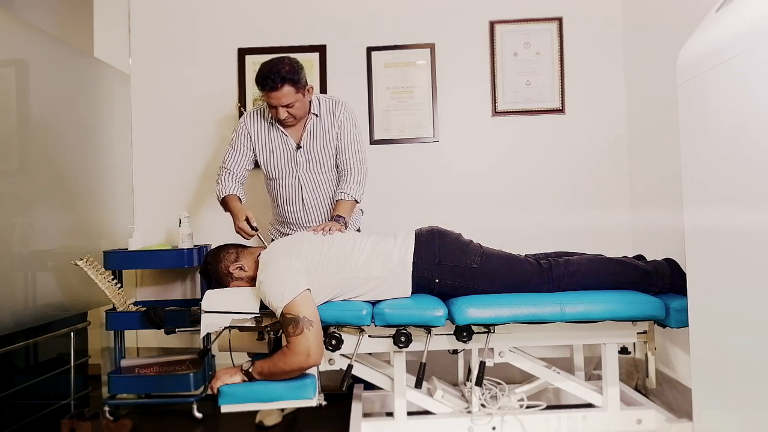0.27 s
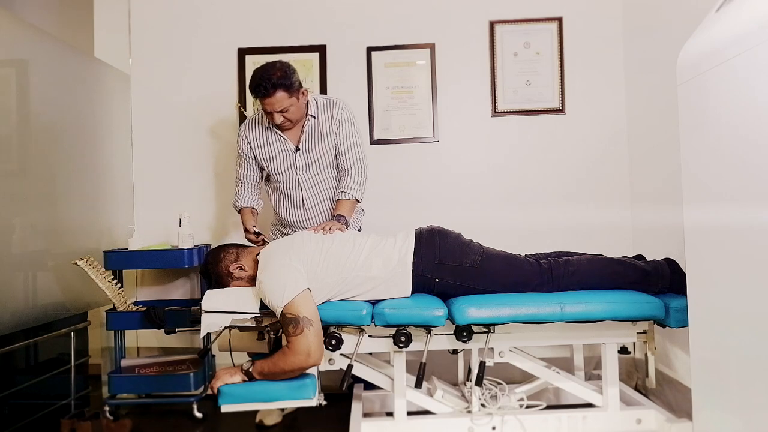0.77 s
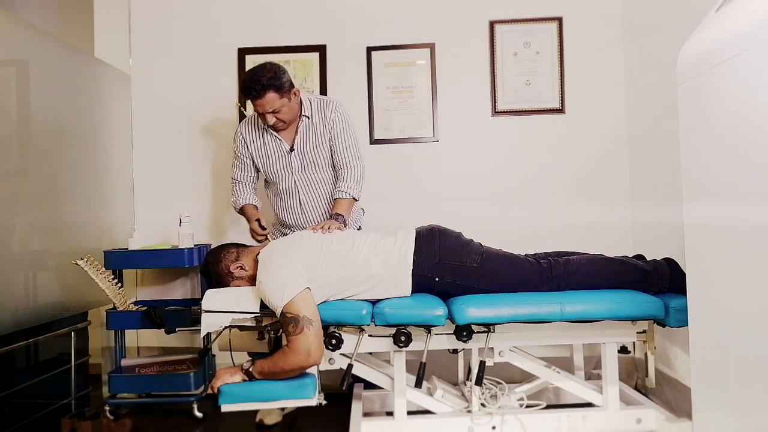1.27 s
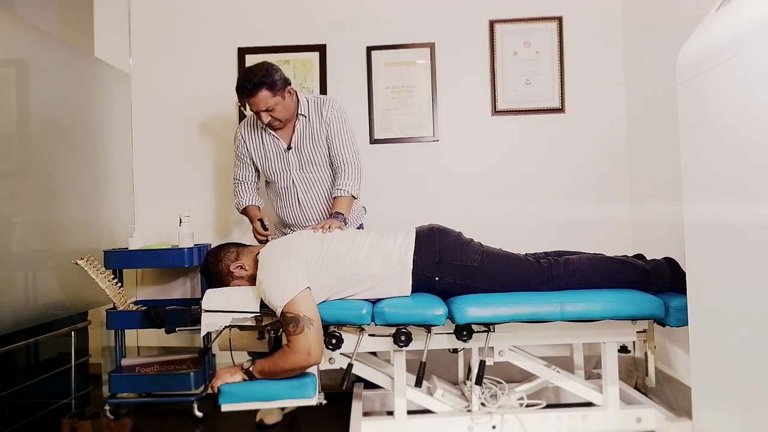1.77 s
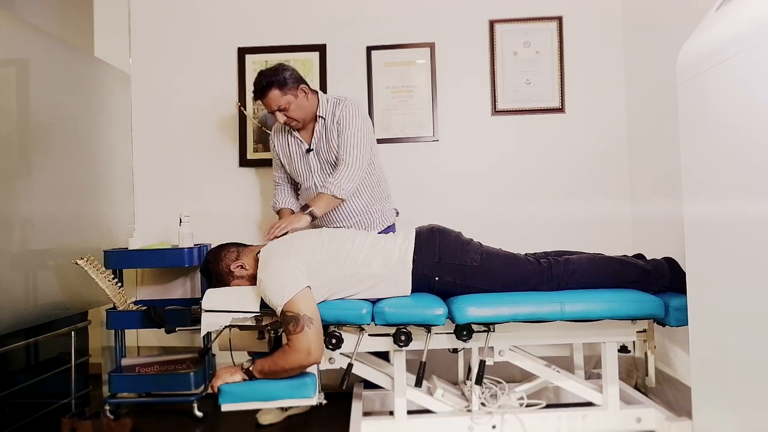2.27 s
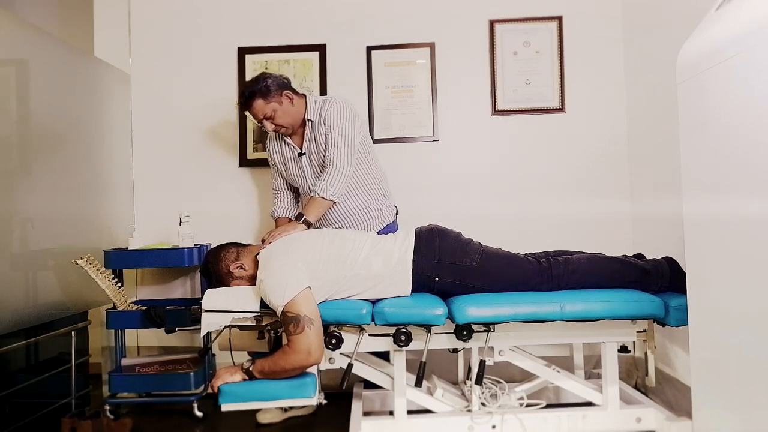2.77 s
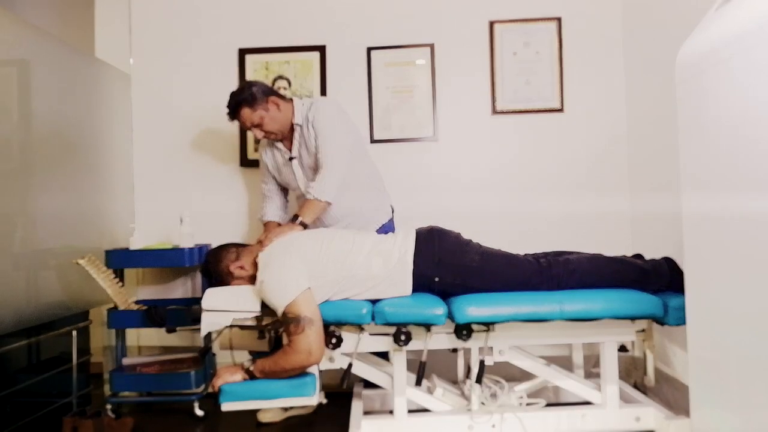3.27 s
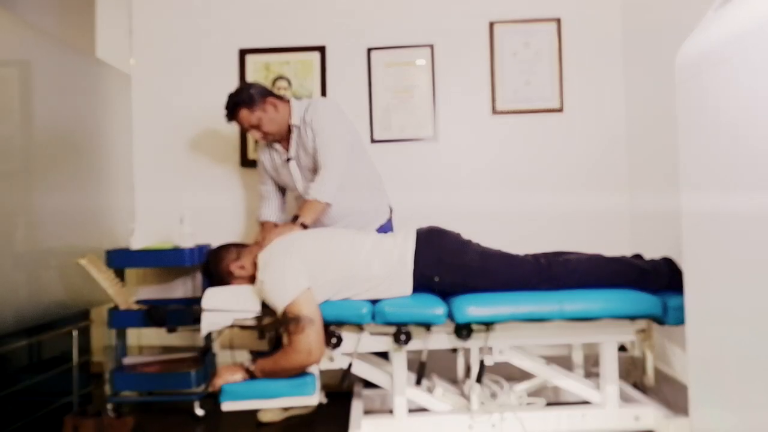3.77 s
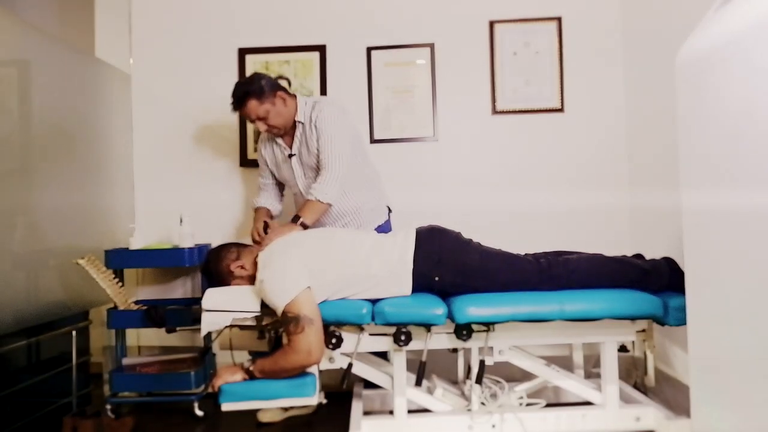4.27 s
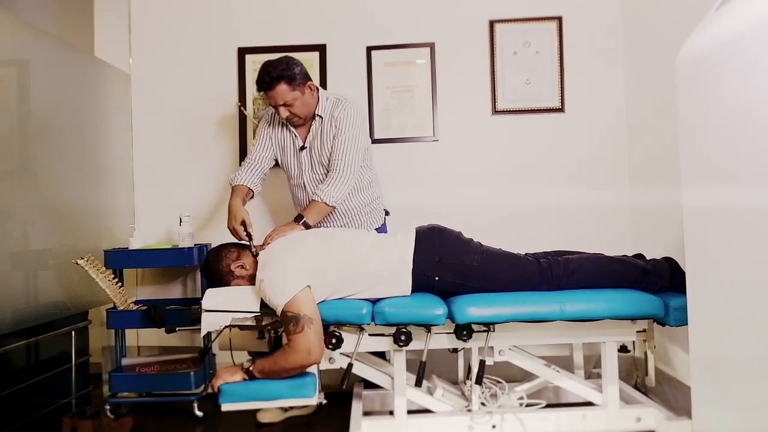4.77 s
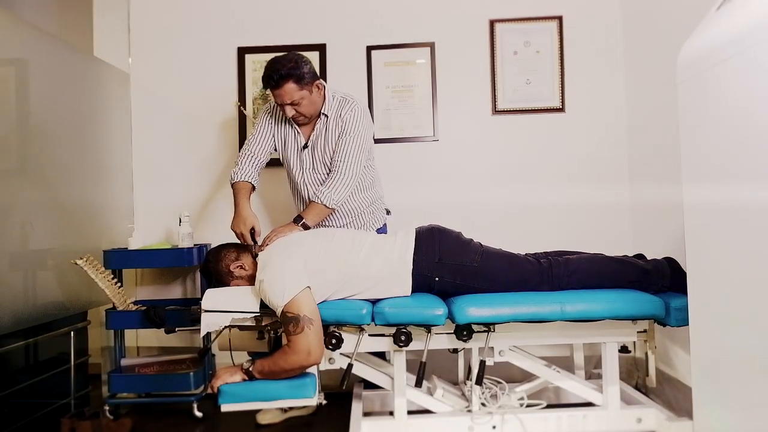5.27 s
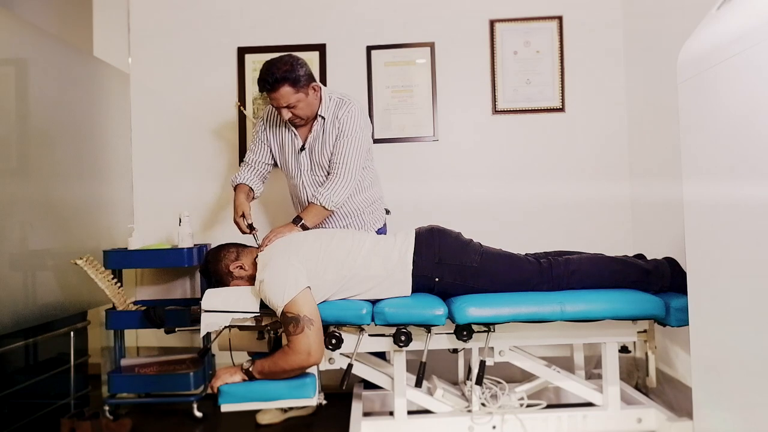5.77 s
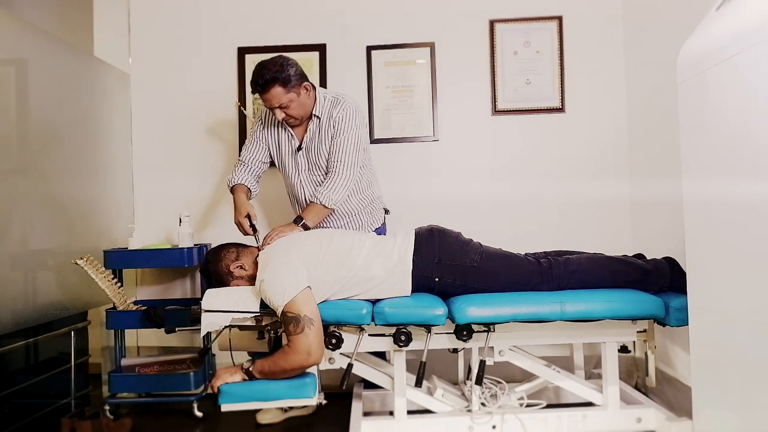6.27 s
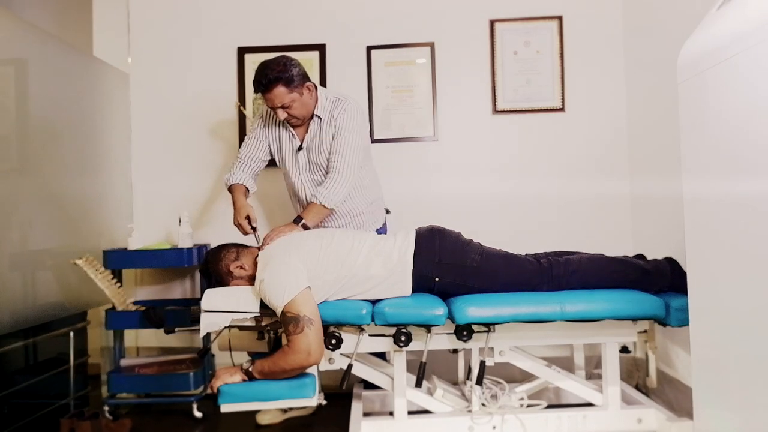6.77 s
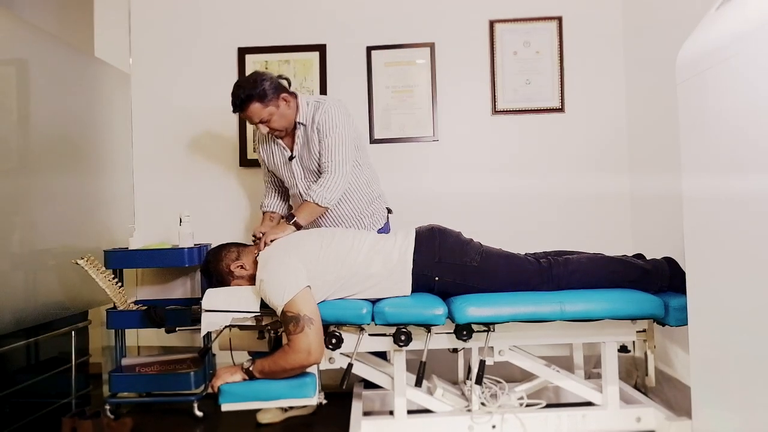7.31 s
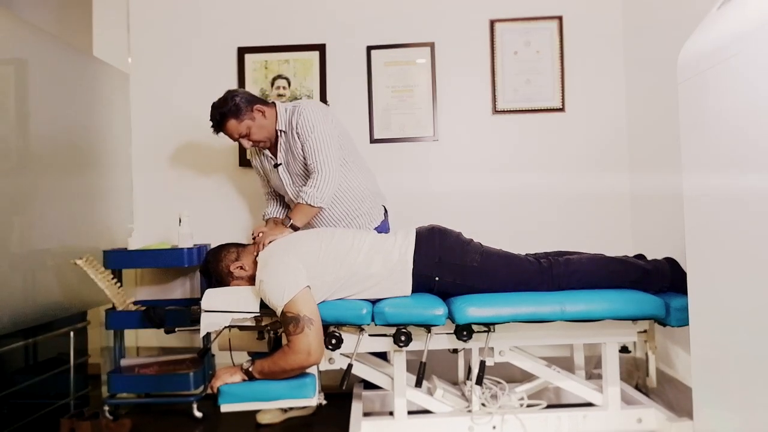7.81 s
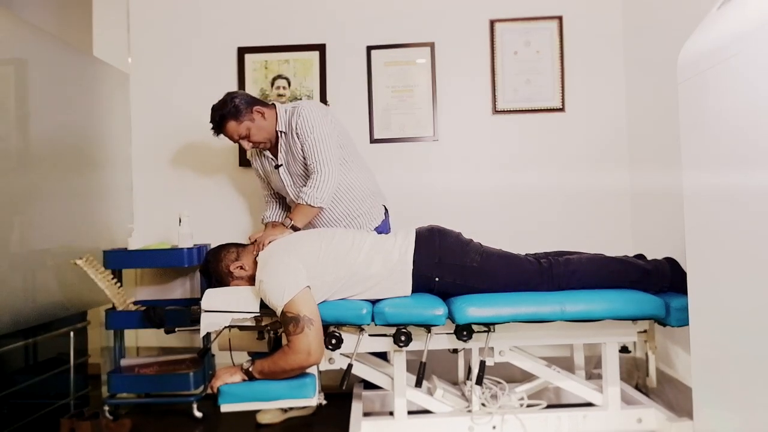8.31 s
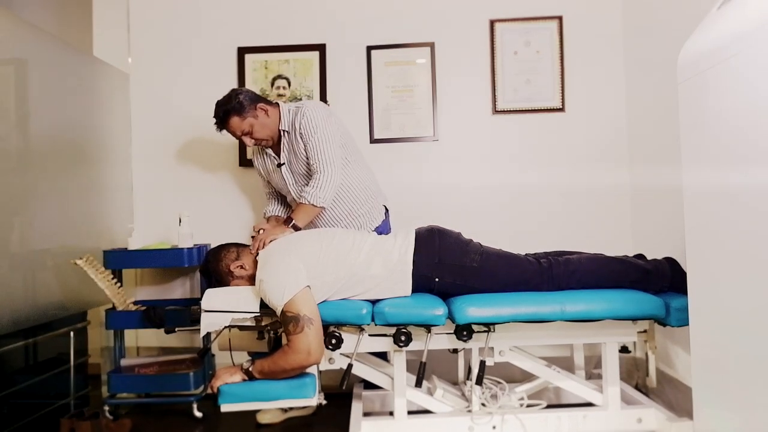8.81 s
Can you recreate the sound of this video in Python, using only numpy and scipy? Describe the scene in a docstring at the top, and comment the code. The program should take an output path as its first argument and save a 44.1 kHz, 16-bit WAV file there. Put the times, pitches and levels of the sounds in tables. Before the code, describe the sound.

Very close to a clip-on microphone, a spring-loaded steel hand instrument is fired repeatedly against a clothed back. Each shot is a handle clack, a tiny catch tick, a hard bright snap with sizzling spring ring, then a click back. Shots come in groups of two to five, about a third of a second apart, with pauses between. Bare walls add a quick flutter; cloth and padding shift softly.

```python
"""Spring-loaded adjusting instrument

It is fired again and again on a person's back, close to a clip-on microphone. At a shot the handle clacks,
the catch ticks, the hammer trips, the steel spring sizzles out and the handle clicks back: shaped noise bursts.
Blows and ticks flutter between two bare walls (repeated echoes) and fade in a diffuse tail.
Noise also makes the padded table's thuds, cloth brushes and room air; drifting sines make a faint whine."""
import sys
import numpy as np
from scipy import signal
from scipy.fft import rfft, irfft, next_fast_len
from scipy.io import wavfile
from scipy.ndimage import map_coordinates

SR = 44100
rng = np.random.default_rng(int(sys.argv[2]) if len(sys.argv) > 2 else 0)


def store_pcm(level_fs):
    """Save levels as 16-bit WAV."""
    pcm = np.round(np.clip(level_fs, -1, 1) * 32767).astype(np.int16)
    wavfile.write(sys.argv[1], SR, np.atleast_2d(pcm).T)


N = 399105  # samples
TOP_HZ = 15700  # band limit

# Spectrum of the steel spring and scraping steel: pitch_hz [Hz], level_db [dB per Hz, relative]
SPRING_SPECTRUM = [(1300, -21), (2200, -7.5), (2700, -4.5), (3700, -2.5), (5300, -3), (7500, -0.5),
                   (10500, -1), (13500, 2), (16000, -3)]
# Spectrum of the ringing barrel: pitch_hz [Hz], level_db [dB per Hz, relative]
BARREL_SPECTRUM = [(700, -32), (1100, -17), (1550, -18), (1720, -5), (1820, 0), (1920, -4), (2080, -13),
                   (2600, -20), (4000, -38)]
# Spectrum of brushing cloth: pitch_hz [Hz], level_db [dB per Hz, relative]
CLOTH_SPECTRUM = [(100, -5), (500, -1.5), (3000, -1), (8000, 0), (16000, -10.5)]


def amp(db):
    """Decibels to linear gain."""
    return 10 ** (np.asarray(db) / 20)


def unit(x):
    """Scale to rms 1."""
    return x / np.sqrt(np.mean(x ** 2) + 1e-20)


def colour(points, hz):
    """Gain of (Hz, dB) points on a log axis."""
    f, db = np.transpose(points)
    return amp(np.interp(np.log(hz + 1), np.log(f + 1), db))


def noise(points, size, ripple_db=0, ripple_hz=600):
    """Coloured noise of rms 1, with chance resonances about ripple_hz apart."""
    hz = np.fft.rfftfreq(size, 1 / SR)
    ripple = map_coordinates(rng.standard_normal(512), [hz / ripple_hz], mode="wrap")
    spectrum = rfft(rng.standard_normal(size)) * colour(points, hz)
    return unit(irfft(spectrum * amp(ripple_db * ripple), size))


def swell(t, rise, t60):
    """Peaks at t = 0: climbs 60 dB in rise seconds, falls 60 dB in t60."""
    return amp(60 * np.minimum(t / rise, -t / t60))


def rattle(depth_db):
    """One second of random level shake, about 250 steps a second, as a gain of rms 1."""
    steps = np.arange(SR) / SR * 250
    return unit(amp(depth_db * map_coordinates(rng.standard_normal(256), [steps], mode="wrap")))


def resonance(hz, skirt_db):
    """Spectrum of a damped mode, down to skirt_db at 0.7 and 1.54 times its frequency."""
    return [(.5 * hz, -40), (0.7 * hz, skirt_db), (hz, 0), (1.54 * hz, skirt_db), (2 * hz, -30), (4 * hz, -55)]


def contact(points, envelope, ripple_db=0):
    """A brief broadband burst, its random spectrum partly evened out; rms 1 when counted over 4.5 ms."""
    size = len(envelope)
    hz = np.fft.rfftfreq(size, 1 / SR)
    z = rfft(rng.standard_normal(size) * envelope)
    evened = z / np.sqrt(np.abs(z) + 1e-9)
    ripple = map_coordinates(rng.standard_normal(64), [hz / 900], mode="wrap")
    x = irfft(evened * colour(points, hz) * amp(ripple_db * ripple), size)
    return x / np.sqrt(np.sum(x ** 2) / (.0045 * SR))


def add(track, s, sound):
    """Mix a sound into the track from time s."""
    start = round(s * SR)
    sound = sound[max(-start, 0):N - start]
    track[max(start, 0):][:len(sound)] += sound


def background():
    """Room air, a thin whine of slowly drifting phase, and a soft rustle as the hands move to a new spot."""
    # Room air spectrum: pitch_hz [Hz], level_db [dB per Hz, relative]
    air_spectrum = [(15, -22.5), (25, -17), (86, -8), (178, -3), (267, 1), (421, -1), (598, 3), (1200, -8),
                    (1300, -5), (1410, -6), (4620, -16), (9500, -19.5), (15000, -21)]
    # Room air level over time: time_s [s], level_db [dB, before the trim below]
    air_levels = [(0.0, -41), (0.28, -38), (0.91, -44.5), (1.71, -35.5), (2.7, -44), (4.21, -34),
                  (4.89, -41.5), (5.52, -37.5), (6.37, -47), (6.83, -39.5), (7.81, -42), (8.12, -37.5),
                  (9.05, -38.5)]
    # Whine tones: pitch_hz [Hz], level_db [dB rms]
    whine_tones = [(102, -70), (614, -76.5), (1335, -60)]
    t = np.arange(N) / SR
    air_trim_db = -5
    air = amp(np.interp(t, *np.transpose(air_levels)) + air_trim_db) * noise(air_spectrum, N)
    whine = np.zeros(N)
    for hz, db in whine_tones:
        drift = np.cumsum(rng.standard_normal(N)) / np.sqrt(SR)
        whine += amp(db) * np.sqrt(2) * np.sin(2 * np.pi * hz * t + 6 * drift)
    rustle = amp(-48.0) * noise(CLOTH_SPECTRUM, N) * swell(t - 2.42, 2.5, 2.0)
    return air + whine + rustle


def handling():
    """Weight shifts on the padding in soft low thuds, and cloth brushes cloth."""
    # Padded table spectrum: pitch_hz [Hz], level_db [dB per Hz, relative]
    pad_spectrum = [(25, -13.5), (60, -9.5), (100, -0.5), (170, -7), (280, -17), (700, -26), (2000, -76)]
    # Soft thuds of the table: start_s [s], level_db [dB], t60_s [s]
    thuds = [(0.171, -31.5, 0.15), (0.954, -42, 0.31), (2.092, -47, 0.57), (2.527, -38.5, 0.2),
             (2.69, -48, 0.24), (4.442, -43, .25), (7.448, -31, 0.14), (7.51, -40, 0.21)]
    # Sleeve and shirt brushing: start_s [s], level_db [dB], t60_s [s]
    brushes = [(2.53, -37.5, 0.34), (6.19, -45.5, 0.27), (6.35, -45, 0.25), (7.43, -28.5, 0.23)]
    out, t = np.zeros(N), np.arange(SR) / SR - 1 / 10
    for s, db, t60 in thuds:
        add(out, s + t[0], amp(db) * noise(pad_spectrum, SR) * swell(t - .01, 0.2, t60))
    for s, db, t60 in brushes:
        add(out, s + t[0], amp(db) * noise(CLOTH_SPECTRUM, SR) * swell(t, 0.0142, t60))
    return out


def reverb(x, low_t60=1.1, high_t60=0.25):
    """The small room's diffuse tail, treble dying first."""
    hz, t, z = signal.stft(rng.standard_normal(SR), SR, nperseg=256)
    t60 = np.interp(np.log(hz + 1), np.log([500, 12000]), [low_t60, high_t60])
    tail = signal.istft(z * amp(-60 * t / t60[:, None]), SR, nperseg=256)[1]
    return signal.fftconvolve(x, tail / np.linalg.norm(tail))[:N]


def flutter(x, first_db, trip_db):
    """Sound bounces between parallel walls, a little weaker on every round trip."""
    round_trip_s = .0167
    out = x.copy()
    for k in range(12):
        lag = round((k + 1) * round_trip_s * SR)
        out[lag:] += amp(first_db + k * trip_db) * x[:-lag]
    return out


def contacts():
    """Every press, catch slip, stray tick and release as (s, steel dB, ring dB, ring Hz, knock dB)."""
    # The handle is pressed home: start_s [s], knock_db [dB], steel_db [dB], ring_hz [Hz]
    presses = [(0.084, -25.5, -16.5, 1910), (0.3857, -24.5, -18.5, 1860), (1.4136, -38, -19.5, 2000),
               (1.7267, -37.5, -20.5, 1800), (3.2713, -38, -35.5, 2670), (3.6211, -38.5, -26, 2300),
               (3.934, -35.5, -26, 2550), (4.2172, -38, -26, 3230), (4.9259, -35, -52, 2010),
               (5.4098, -22, -22.5, 2100), (6.514, -37.5, -24, 2370), (6.8598, -26.5, -14, 4230),
               (8.2638, -37.5, -39, 1900), (8.6228, -34, -30, 1910)]
    # Catch slips, and a few faint stray high ticks: start_s [s], ring_db [dB], ring_hz [Hz]
    catches_and_ticks = [(0.1104, -18, 12400), (.1367, -11, 10800), (.408, -17, 13100),
                         (0.433, -10.5, 10200), (0.9774, -36.5, 7640), (1.1352, -21, 10600),
                         (1.4636, -17, 14500), (1.7544, -32, 13700), (2.8706, -34, 14200),
                         (2.903, -24.5, 14300), (3.3398, -18, 12000), (3.6515, -24, 14100),
                         (3.9607, -21, 14300), (4.247, -23, 14400), (4.684, -41, 12900),
                         (5.0582, -19, 7000), (5.072, -11.5, 10500), (5.448, -21, 12400),
                         (5.4772, -11, 10900), (6.556, -10, 9400), (6.901, -12, 11000), (6.9156, -14, 3470),
                         (7.792, -35.5, 11300), (8.3213, -18.5, 9600)]
    # The handle springs back: start_s [s], steel_db [dB], ring_db [dB], ring_hz [Hz]
    releases = [(0.01, -24, -35, 1870), (.304, -14, -36, 1620), (0.6026, -14.5, -26, 1750),
                (1.324, -19, -32, 1940), (1.6385, -23, -28.5, 1820), (1.9604, -23, -25.5, 3660),
                (3.1288, -21.5, -25, 3500), (3.5369, -21, -24.5, 2930), (3.861, -20.5, -21, 2930),
                (4.1577, -28, -22.5, 2930), (4.4483, -21, -27, 3280), (5.2781, -19, -43, 1970),
                (5.2946, -15, -23, 2120), (5.7034, -21, -24, 2050), (5.7189, -15, -22.5, 2160),
                (6.753, -17.5, -22.5, 4180), (6.769, -17, -20, 4350), (7.097, -15, -16, 3430),
                (8.1133, -25.5, -24.5, 2470), (8.1236, -24, -26, 2580), (8.5343, -25, -21.5, 3750),
                (8.546, -23, -21.5, 4400), (8.8735, -21.5, -26, 2623)]
    # a press's ring grows more slowly than its knock (dB per dB)
    usual_knock_db, usual_ring_db, ring_per_knock = -34, -24.5, 0.76
    # the stronger the ring of a slip or tick, the more steel scrapes (dB per dB)
    hard_tick_db, hard_steel_db, steel_per_ring = -9, -14.5, 1.01
    tick_knock_db = -30.5  # relative to the ring
    release_knock_db = -33.5  # relative to the steel: letting go hardly pushes the grip
    rows = []
    for s, knock_db, steel_db, hz in presses:
        ring_db = usual_ring_db + ring_per_knock * (knock_db - usual_knock_db)
        rows.append((s, steel_db, ring_db, hz, knock_db))
    for s, ring_db, hz in catches_and_ticks:
        steel_db = hard_steel_db + steel_per_ring * (ring_db - hard_tick_db)
        rows.append((s, steel_db, ring_db, hz, ring_db + tick_knock_db))
    for s, steel_db, ring_db, hz in releases:
        rows.append((s, steel_db, ring_db, hz, steel_db + release_knock_db))
    return rows  # steel and knock get a trim in clicks()


def clicks():
    """Short contacts: each mixes scraping steel, a damped ring, a stir of the barrel and a push on the grip."""
    # Spectrum of the pushed grip: pitch_hz [Hz], level_db [dB per Hz, relative]
    grip_spectrum = [(40, -18.5), (150, -2.5), (450, 0.5), (950, -3.5), (1300, -19.5), (2500, -27.5)]
    overtone_ratio, overtone_db = 2.2, -10.5  # second mode of the handle
    steel_trim_db, knock_trim_db = 4.0, 5
    out, t = np.zeros(N), np.arange(4096) / SR - 1 / 40
    for s, steel_db, ring_db, ring_hz, knock_db in contacts():
        scraping = swell(t, 0.0049, 0.01) + amp(-8.5) * swell(t, 0.058, 0.032)
        steel = contact(SPRING_SPECTRUM, scraping, ripple_db=3.5)
        ringing = swell(t, 0.0021, 0.0079) + amp(-15.0) * swell(t, .01, 0.058)
        ring = contact(resonance(ring_hz, skirt_db=-17), ringing)
        overtone_hz = overtone_ratio * ring_hz
        if overtone_hz < TOP_HZ:
            ring = ring + amp(overtone_db) * contact(resonance(overtone_hz, skirt_db=-23.5), ringing)
        barrel = contact(BARREL_SPECTRUM, swell(t, 0.0029, 0.021))
        knock = contact(grip_spectrum, swell(t, 0.002, 0.0042))
        click = amp(steel_db + steel_trim_db) * (steel + amp(-14.5) * barrel)
        click += amp(ring_db) * ring + amp(knock_db + knock_trim_db) * knock
        add(out, s + t[0], click)
    return out


def twangs():
    """After some releases the spring shivers on in one cluster of modes; two faint rustles stand alone."""
    # Spring twangs and two faint rustles: start_s [s], level_db [dB], pitch_hz [Hz]
    twangs_and_rustles = [(3.128, -34, 3070), (3.537, -32.5, 2870), (4.159, -28.5, 2950),
                          (4.806, -47, 3830), (7.791, -44, 10200), (8.114, -29, 2700), (8.875, -27, 2500)]
    out, t = np.zeros(N), np.arange(SR) / SR
    for s, db, hz in twangs_and_rustles:
        add(out, s, amp(db - 60 * t / 0.44) * noise(resonance(hz, skirt_db=-14.5), SR))
    return out


def shots():
    """The handle scrapes, the hammer slides and strikes; the coil's dense modes ring on, the lower ones longest."""
    # Shots: start_s [s], spring_db [dB before trim], barrel_db [dB before trim], scrape_db [dB, squeezing],
    # mode_hz [Hz, strongest coil mode], mode_db [dB]
    shot_list = [(-.13, -22, -21, -25, 3600, -34), (.164, -9, -26, -18, 3560, -43),
                 (.455, -9, -29, -18.5, 3820, -42), (1.166, -11, -25.5, -31, 2900, -26.5),
                 (1.488, -11, -27.5, -22.5, 4030, -19), (1.8, -11, -25.5, -20.5, 4040, -20.5),
                 (2.935, -11.5, -29, -41.5, 3800, -17.5), (3.374, -11, -30, -23, 3660, -21.5),
                 (3.7, -11.5, -30.5, -24.5, 3700, -19), (4.012, -10, -29, -19.5, 3920, -24.5),
                 (4.293, -9.5, -32.5, -25, 3780, -28), (5.114, -8.5, -20.5, -25, 4370, -29),
                 (5.506, -8, -21, -39, 3380, -31), (6.584, -10, -23, -17, 4220, -18.5),
                 (6.94, -9.5, -22, -26, 4530, -46), (7.916, -10.5, -31.5, -45, 2710, -23),
                 (8.358, -10.5, -31, -25, 3100, -24.5), (8.693, -10, -27.5, -20, 3450, -25)]
    # Spectrum of the tip's knock: pitch_hz [Hz], level_db [dB per Hz, relative]
    knock_spectrum = [(30, -87), (90, -40), (170, 0.5), (330, -1.5), (480, 4), (680, 11), (950, 5),
                      (1300, 3.5), (2200, -7.5)]
    usual_shot_db, usual_t60_s, t60_s_per_db = -13, 0.5, 0.01  # a harder shot dies sooner
    spring_trim_db, barrel_trim_db = 1.5, -2
    knock_under_db = 15  # below the untrimmed spring level
    out, t = np.zeros(N), np.arange(SR) / SR - 1 / 10
    hz = np.fft.rfftfreq(SR, 1 / SR)
    high_share = 1 / (1 + (7000 / (hz + 1)) ** 4)
    tripped = np.clip((t + 0.027) / 0.0082, 0, 1)  # the catch lets go just before the blow
    for s, spring_db, barrel_db, scrape_db, mode_hz, mode_db in shot_list:
        t60 = usual_t60_s - t60_s_per_db * (spring_db - usual_shot_db)
        scrape = noise(SPRING_SPECTRUM, SR, ripple_db=4, ripple_hz=925) * rattle(depth_db=4)
        scrape *= swell(t + 0.038, 0.13, 0.25) * (1 - tripped)
        coil = noise(SPRING_SPECTRUM, SR, ripple_db=1.7, ripple_hz=200.2) * rattle(depth_db=0.33)
        high = irfft(rfft(coil) * high_share, SR)
        spring = high * swell(t, 0.24, 1.004 * t60) + (coil - high) * swell(t, 0.071, 1.356 * t60)
        crack = amp(-2.5) * noise(SPRING_SPECTRUM, SR, ripple_db=3.0) * swell(t, 0.049, 0.038)
        mode = noise(resonance(mode_hz, skirt_db=-9), SR) * swell(t, 0.11, 0.7)
        # the loose barrel rattles as it rings
        barrel_envelope = swell(t, 0.12, .62) + amp(-10) * swell(t, 0.0098, 0.058)
        barrel = noise(BARREL_SPECTRUM, SR) * rattle(depth_db=3) * barrel_envelope
        knock = noise(knock_spectrum, SR) * swell(t - .012, 0.17, 0.51)
        blow = amp(spring_db + spring_trim_db) * (spring + crack) + amp(mode_db) * mode
        blow += amp(barrel_db + barrel_trim_db) * barrel + amp(spring_db - knock_under_db) * knock
        add(out, s + t[0], tripped * blow + amp(scrape_db) * scrape)
    return out


def scene():
    """Blows and ticks flutter between the walls and fade in the room; both channels are the same."""
    # The flutter is strong when the therapist stands upright, weak when he leans over the table:
    # time_s [s], first_echo_db [dB]
    posture = [(.6, -11), (1.3, -7), (4.5, -6), (4.9, -9), (7.2, -9.5), (7.9, -5)]
    blows, ticks = shots() + twangs(), clicks()
    echo_gain = amp(np.interp(np.arange(N) / SR, *np.transpose(posture)))
    tick_echoes = flutter(ticks, first_db=0, trip_db=-3.4) - ticks
    echoing_ticks = ticks + echo_gain * tick_echoes
    echoing_blows = flutter(blows, first_db=-26, trip_db=-1.5)
    tail = amp(-16) * reverb(blows + ticks)
    mono = echoing_ticks + echoing_blows + tail + handling() + background()
    return np.array([mono, mono])


def record(dry):
    """The microphone sheds deep bass, the loudest peaks round off near full scale, and the top is cut off."""
    lean = signal.sosfilt(signal.butter(2, 50, "highpass", fs=SR, output="sos"), dry)
    clipped = lean / (1 + np.abs(lean / 1.02) ** 6) ** (1 / 6)
    size = next_fast_len(N + 8192)
    passband = np.fft.rfftfreq(size, 1 / SR) < TOP_HZ
    return irfft(rfft(clipped, size) * passband, size)[:, :N]


dry = scene()
out = record(dry)
store_pcm(out)
```